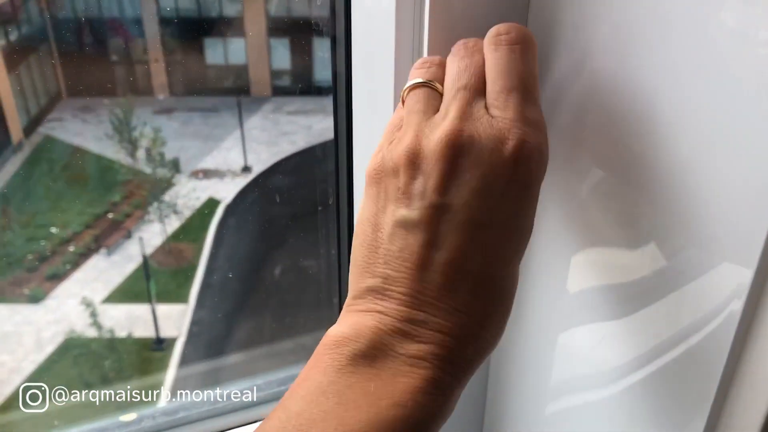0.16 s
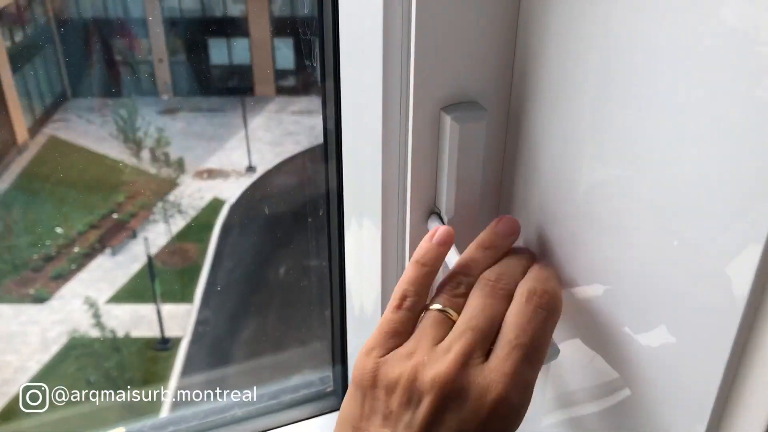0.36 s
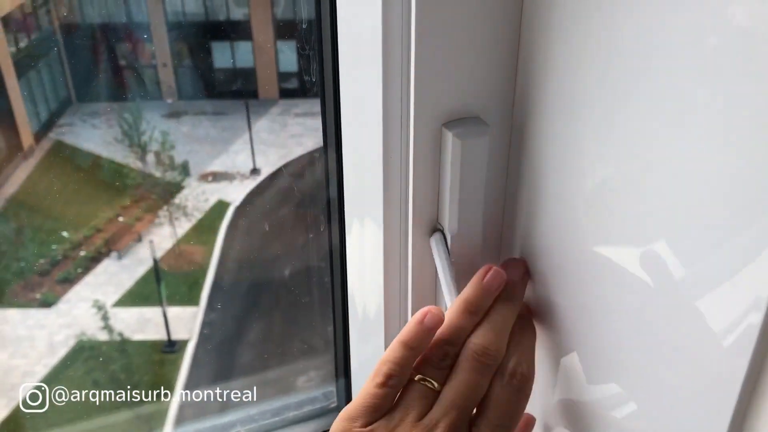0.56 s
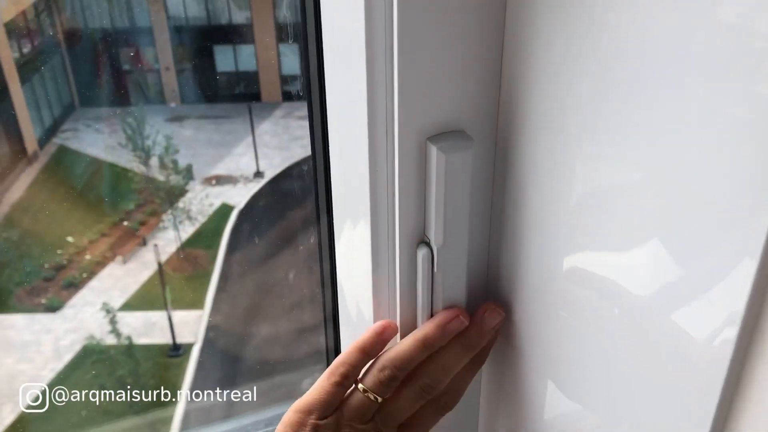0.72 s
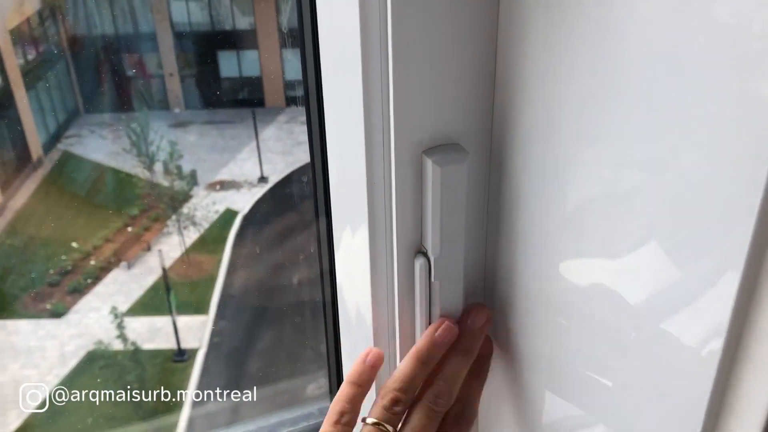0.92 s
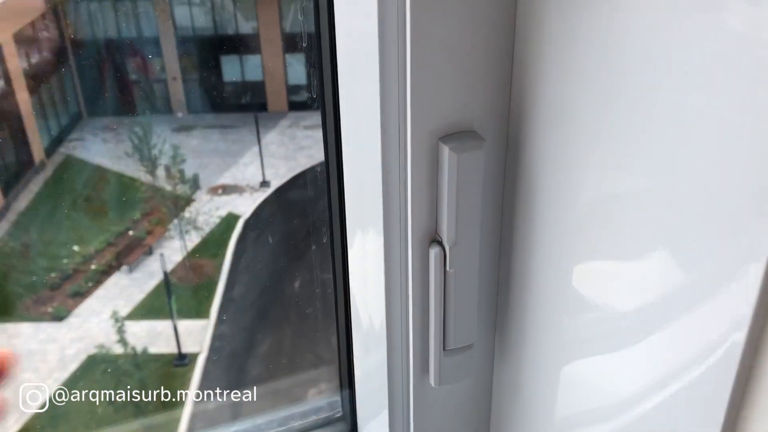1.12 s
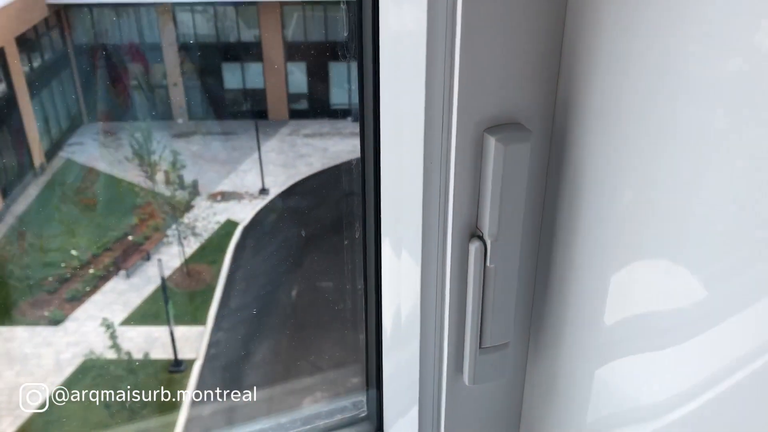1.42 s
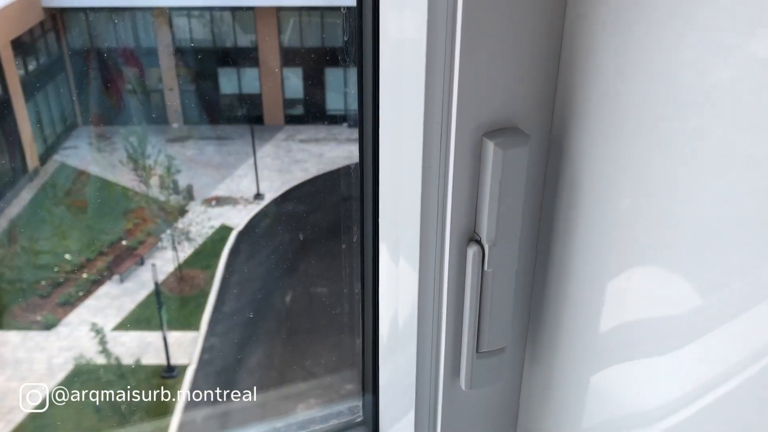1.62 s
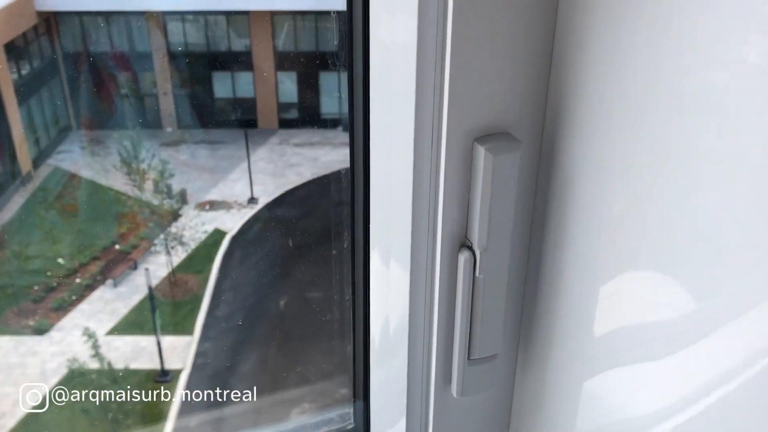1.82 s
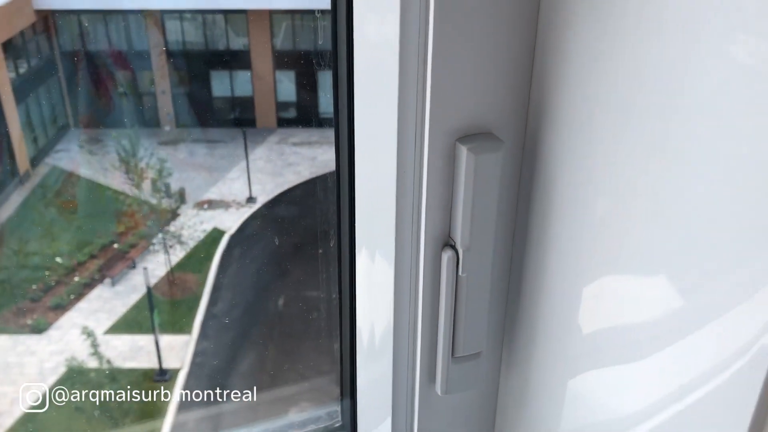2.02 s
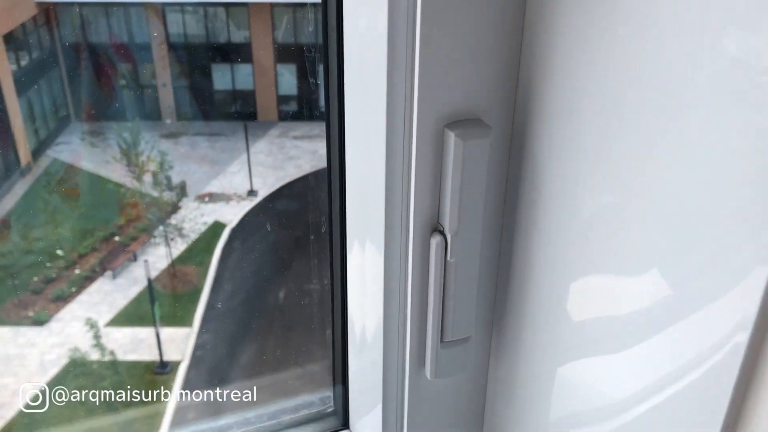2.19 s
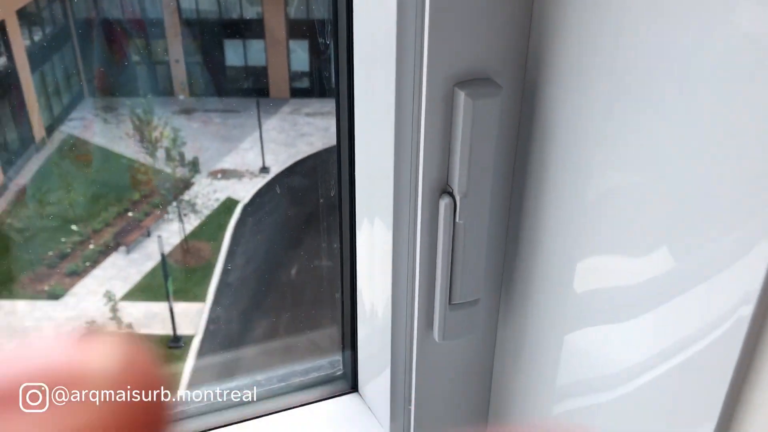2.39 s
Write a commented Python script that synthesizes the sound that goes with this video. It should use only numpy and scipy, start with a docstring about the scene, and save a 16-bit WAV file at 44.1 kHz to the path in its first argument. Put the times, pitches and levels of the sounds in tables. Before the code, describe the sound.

A window is closed and latched, close-miked in a bare, ringing room. Light knocks from 0.06 s build to a loud, slightly overloaded thunk with metal clatter at 0.3 s. Latch clacks follow at 0.46, 0.58, 0.65 and 0.72 s, with brief rubbing around 0.57-0.7 s. The ring fades into low, wavering room tone, faint ticks at 0.94, 1.23 and 1.78 s, soft bumps at 1.5 and 1.8 s; quiet hiss enters at 2.3 s.

```python
"""A window sash is pushed shut close to the microphone and its metal latch lever is folded down.
Coloured noise bursts and damped modes make the thunks, clacks and snaps; a bare room rings after the knocks.
Grainy noise makes the rubbing of fingers and lever, gliding sines make soft bumps in the frame.
Then a low, wavering room tone remains with thin air noise and a few faint ticks and bumps.
At the end a soft noise hiss with two faint whistles swells in."""
import sys
import numpy as np
from scipy import signal
from scipy.fft import rfft, irfft, next_fast_len
from scipy.io import wavfile
from scipy.ndimage import map_coordinates

SR = 44100
rng = np.random.default_rng(int(sys.argv[2]) if len(sys.argv) > 2 else 0)


def waveform_to_disk(signal):
    """Save audio, clipped to [-1, 1], as 16-bit WAV at the path in sys.argv[1]."""
    frames = np.transpose(np.atleast_2d(signal))
    scaled = np.clip(frames, -1, 1) * 32767
    samples = np.round(scaled).astype(np.int16)
    wavfile.write(sys.argv[1], SR, samples)


N = 112454
TIME = np.arange(N) / SR

# Contacts of sash and latch: t/s, frame body level/dB, clack level/dB, snap level/dB,
# top click level/dB, latch ring level/dB, frame t60/s, metal t60/s
KNOCKS = [(.0618, -22, -24, -37.5, -54, -50, 0.048, .02), (.0698, -22, -23.5, -34, -39, -50, 0.059, 0.028),
          (.105, -15, -57, -52, -59.5, -62, 0.03, 0.037), (.1938, -59, -33, -35.5, -34, -61, .03, 0.0062),
          (.2052, -21.5, -31, -35.5, -41, -58, 0.27, 0.038),
          (.2152, -20.5, -29, -50, -48, -35, 0.19, 0.054), (.2378, -14, -31, -37.5, -39.5, -24, 0.11, .022),
          (0.249, -5, -19.5, -32.5, -40, -23, 0.044, 0.012),
          (.2555, -19.5, -19.5, -35.5, -24, -42, .05, 0.069),
          (.2728, -9, -24.5, -29.5, -46, -52.5, 0.035, 0.03),
          (.2925, -5.5, -2.5, -12.5, -13.5, -10, 0.043, 0.016),
          (0.2968, 3.5, -9.5, -8.5, -21, -14.5, .07, 0.044), (.3025, 0, -9, -15, -20, -34, .08, 0.041),
          (.3135, -4, -48, -28, -48, -59, 0.087, 0.027), (.356, -12, -30.5, -47, -49.5, -53, 0.039, .03),
          (.4636, -11.5, -13.5, -22, -19.5, -10, 0.051, 0.017),
          (.5785, -13.5, -19.5, -21, -18.5, -24, 0.026, 0.022),
          (0.6532, -9, -16.5, -25, -31.5, -52, 0.047, 0.011),
          (0.6569, -7, -23.5, -48.5, -45, -52, 0.025, 0.053),
          (.7202, -10.5, -12, -10, -28.5, -53, 0.035, 0.0067)]
# Colour of the frame body: f/Hz, relative level/dB
BODY_COLOUR = [(40, -28), (110, -17), (180, -11.5), (270, -4), (380, -2.5), (460, -1), (570, -2.5),
               (680, -10.5), (800, -10.5), (1050, -18), (1600, -40), (4000, -71)]
# Colour of the metal clack: f/Hz, relative level/dB
CLACK_COLOUR = [(300, -37.5), (800, -6), (1250, 4.5), (1500, 0.5), (2000, 3), (2400, 2), (2830, -0.5),
                (3100, -0.5), (3800, -22.5), (6000, -38)]
# Colour of the brighter metal snap: f/Hz, relative level/dB
SNAP_COLOUR = [(1500, -39), (2800, -4.5), (3600, 3.5), (4300, -0.5), (5200, 0), (6300, -11), (10000, -31)]
# Colour of the metal's top click: f/Hz, relative level/dB
CLICK_COLOUR = [(3500, -46), (6200, 4), (9500, -2), (12500, -7.5), (15500, -8)]
# Ringing modes of the latch: f/Hz, relative level/dB, t60/s
LATCH_MODES = [(2620, -5, .018), (2830, 0, .026), (3200, -9, .016), (4600, -16, .015), (8450, -24, .015)]
# Modes of sash and pane, one list per column: f/Hz; relative level/dB; t60/s
SASH_HZ = [119, 172, 224, 268, 338, 435, 460, 553, 588, 712, 776, 1015]
SASH_MODE_DB = [-8, -15, -5.5, -7, -10, 1, -8.5, -13.5, -20, -13, -4.5, -13.5]
SASH_T60_S = [.8, 0.79, 0.19, 0.15, 0.87, 0.28, 0.32, 0.29, 0.28, 0.68, 0.15, 0.32]
# Modes of the clamped pane: f/Hz, relative level/dB, t60/s
LOCKED_MODES = [(138, 1, .6), (470, -4, .8), (481, -1, .95)]
BODY_ATTACK_S, METAL_ATTACK_S = 0.00054, 0.00017
EVENNESS = 0.71  # how flat a contact's spectrum is before the body colours it (0-1)
SASH_DB = -16  # sash modes, relative to the frame body
LOCKED_S, LOCKED_DB = .72, -31

# Strokes of fingers and lever: start t/s, length/s, level/dB
RUBS = [(0.057, 0.043, -44.5), (0.569, 0.033, -32.5), (0.6, 0.083, -40), (0.656, 0.053, -44.5)]
# Colour of the friction: f/Hz, relative level/dB
RUB_COLOUR = [(300, -43), (1000, -2), (2500, -0.5), (4500, -5), (7500, -8), (11000, -10.5), (15500, -15)]
RUB_ATTACK_S, RUB_RELEASE_S, RUB_GRAIN_DB = 0.0042, 0.0084, 3.5

# Dull pushes on the frame, gliding in pitch: t/s, level/dB, first f/Hz, last f/Hz, length/s
THUDS = [(.292, -23, 74, 30.7, 0.058), (.318, -29, 330, 150, 0.045), (.33, -24, 69, 57, .07),
         (0.469, -32, 68, 58, 0.076), (.68, -21, 86, 125, 0.035), (1.518, -36.5, 104, 45, .03),
         (1.782, -27, 174, 68, 0.022)]
# Small dry ticks in the frame: t/s, level/dB
TICKS = [(.943, -44), (1.229, -46), (1.779, -32.5)]
# Colour of a tick: f/Hz, relative level/dB
TICK_COLOUR = [(200, -22), (600, -10), (850, -14), (1100, -1), (1380, -9), (1650, -1), (2400, -6),
               (3000, -12), (3400, -6), (4000, -14), (5000, -20), (6100, -9), (9800, -12), (11000, -34),
               (15000, -45)]
TICK_T60_S = .017

# Colour of the hiss: f/Hz, relative level/dB
HISS_COLOUR = [(290, -40), (500, -22), (603, -1), (666, -7), (706, -2.5), (982, -3.5), (1170, -5.5),
               (2720, -7), (3060, -10), (3330, -1.5), (3790, -7), (6180, -11.5), (15500, -23.5)]
# Faint whistles in the hiss: f/Hz, level relative to the hiss/dB
HISS_WHISTLES = [(1003, -17), (3303, -17)]
HISS_START_S, HISS_RISE_S, HISS_DB, HISS_GROWS_DB_PER_S = 2.318, 0.035, -45.5, 6

# Decay time of the bare room: f/Hz, t60/s
ROOM_T60 = [(100, 0.58), (300, .8), (700, 0.84), (2000, 0.81), (5000, 0.73), (9000, 0.65), (15000, .3)]
# Strength of the room tail: f/Hz, level/dB
ROOM_GAIN = [(100, -5.5), (500, -3), (900, -0.5), (1400, -7), (2800, -8.5), (4000, -11.5), (5000, -10),
             (7000, -11.5), (8500, -7.5), (10000, -15), (14000, -9)]
ROOM_BUILD_S = 0.0027

# Course of the low room tone, before its waver: t/s, level/dB
TONE_LEVEL = [(0, -41), (.9, -42.5), (1.2, -42), (1.55, -44.5), (1.68, -41), (1.78, -49.5), (1.92, -49.5),
              (2.02, -45), (2.17, -43.5), (2.3, -42.5), (2.55, -41.5)]
# Colour of the room tone: f/Hz, relative level/dB
TONE_COLOUR = [(15, -58), (25, -22.5), (103, -8), (165, -8), (266, -5), (308, -9), (377, -9), (406, -17.5),
               (534, -15), (575, -24), (743, -21.5), (2000, -46.5), (2600, -64), (4400, -120)]
TONE_WAVER_DB = 1.1
# Colour of earlier handling, still dying away in the room: f/Hz, relative level/dB
HANDLING_COLOUR = [(60, -38.5), (95, -16), (150, 10), (300, -6), (500, -1), (900, -4.5), (1500, -24.5),
                   (3000, -25), (7000, -36), (15000, -42)]
HANDLING_DB, HANDLING_FADE_DB_PER_S = -30, 26
# Colour of the thin air noise: f/Hz, relative level/dB
AIR_COLOUR = [(100, 11.5), (1500, 1.5), (3000, -4.5), (6000, -5.5), (9300, -9), (10000, -5), (10700, -9.5),
              (15500, -8.5)]
AIR_DB = -55

CLIP_TOP, TOP_HZ = 1.02, 15850  # overload ceiling (1 = full scale), band limit


def amp(db):
    """Decibels to gain."""
    return 10 ** (np.asarray(db) / 20)


def unit(x):
    """Scale to rms 1."""
    return x / np.sqrt(np.mean(x ** 2) + 1e-20)


def along(points, hz):
    """Read (f/Hz, value) points along a log frequency axis."""
    f, value = np.transpose(points)
    return np.interp(np.log(hz + 1), np.log(f + 1), value)


def add(track, s, x):
    """Mix x into the track at time s."""
    i = round(s * SR)
    track[i:i + len(x)] += x[:N - i]


def noise(colour):
    """Steady noise of rms 1, filtered to a colour."""
    gain = amp(along(colour, np.fft.rfftfreq(N, 1 / SR)))
    return unit(irfft(rfft(rng.standard_normal(N)) * gain, N))


def wobble(rate):
    """A smooth random curve through `rate` knots a second."""
    knots = rng.standard_normal(int(N * rate / SR) + 4)
    return map_coordinates(knots, [TIME * rate])


def burst(colour, t60, attack):
    """A brief random contact force rung through a body of the given colour, one second long."""
    t = TIME[:SR]
    shape = amp(-60 * t / t60) * (1 - np.exp(-t / attack))
    force = rfft(rng.standard_normal(SR) * shape)
    flattened = irfft(force / np.abs(force) ** EVENNESS, SR)
    flattened = flattened * (t < 2 * t60)
    # a minimum-phase filter, so that the body never sounds before it is struck
    log_gain = np.log(amp(along(colour, np.fft.rfftfreq(SR, 1 / SR))))
    cepstrum = irfft(log_gain, SR)
    body = np.exp(rfft(2 * cepstrum * (t > 0) * (t < .5)))
    coloured = unit(irfft(rfft(flattened) * body, SR))
    return coloured * np.sqrt(np.mean(shape ** 2))


def ring(modes):
    """One second of damped modes, each with a random phase and about 2 dB of level scatter."""
    t = TIME[:SR]
    tones = np.zeros(SR)
    for hz, db, t60 in modes:
        decay = amp(db + 2 * rng.normal() - 60 * t / t60)
        tones += decay * np.sin(2 * np.pi * (hz * t + rng.random()))
    return tones * (1 - np.exp(-t / BODY_ATTACK_S))


def room(x):
    """The dry sound plus a fresh noise tail that dies at its own pace in each band of the bare room."""
    hz, t, grains = signal.stft(rng.standard_normal(SR), SR, nperseg=256)
    t60 = along(ROOM_T60, hz)[:, None]
    even_energy = np.sqrt(2 * np.log(1000) / (t60 * SR))  # long decays add no extra energy
    gain = amp(along(ROOM_GAIN, hz))[:, None] * even_energy
    tail = signal.istft(grains * gain * amp(-60 * t / t60), SR, nperseg=256)[1][:SR]
    tail = tail * (1 - np.exp(-TIME[:SR] / ROOM_BUILD_S))
    return np.pad(x, (0, SR - 1)) + signal.fftconvolve(x, tail)


def knocks():
    """Each contact shakes frame and pane and clacks the latch metal; the clamped pane sings on at the end."""
    out = np.zeros(N)
    for s, body_db, clack_db, snap_db, click_db, ring_db, frame_t60, metal_t60 in KNOCKS:
        frame = amp(body_db) * burst(BODY_COLOUR, frame_t60, BODY_ATTACK_S)
        metal = np.zeros(SR)
        for db, colour in [(clack_db, CLACK_COLOUR), (snap_db, SNAP_COLOUR), (click_db, CLICK_COLOUR)]:
            metal += amp(db) * burst(colour, metal_t60, METAL_ATTACK_S)
        latch = amp(ring_db) * ring(LATCH_MODES)
        add(out, s, room(frame + metal + latch))
        sash = ring(zip(SASH_HZ, SASH_MODE_DB, SASH_T60_S))
        add(out, s, amp(body_db + SASH_DB) * sash)
    add(out, LOCKED_S, amp(LOCKED_DB) * ring(LOCKED_MODES))
    return out


def rubs():
    """Fingers and lever slide with friction: noise strokes with a fast random grain, heard in the room."""
    strokes = np.zeros(N)
    for s, length, db in RUBS:
        fade_in = np.clip((TIME - s) / RUB_ATTACK_S, 0, 1)
        fade_out = np.clip((s + length - TIME) / RUB_RELEASE_S + .5, 0, 1)
        strokes += amp(db) * fade_in * fade_out
    friction = unit(noise(RUB_COLOUR) * amp(RUB_GRAIN_DB * wobble(330)))
    return room(strokes * friction)[:N]


def thuds():
    """The frame flexes for a few low cycles: short sine swells that glide in pitch."""
    out = np.zeros(N)
    for s, db, first_hz, last_hz, length in THUDS:
        u = np.linspace(0, 1, int(length * SR))
        phase = np.cumsum(first_hz * (last_hz / first_hz) ** u) / SR
        swell = np.sin(np.pi * u ** .75)  # peaks a little before the middle
        add(out, s, amp(db) * swell * np.sin(2 * np.pi * phase))
    return out


def ticks():
    """The closed frame settles with dry ticks: short bursts without room."""
    out = np.zeros(N)
    for s, db in TICKS:
        add(out, s, amp(db) * burst(TICK_COLOUR, TICK_T60_S, METAL_ATTACK_S))
    return out


def hiss():
    """Even coloured noise with two faint whistles of drifting phase swells in at the end."""
    t = TIME - HISS_START_S
    whistles = np.zeros(N)
    for hz, db in HISS_WHISTLES:
        whistles += amp(db) * np.sin(2 * np.pi * hz * TIME + 1.8 * wobble(70))
    level = np.clip(t / HISS_RISE_S, 0, 1) * amp(HISS_DB + HISS_GROWS_DB_PER_S * t)
    return level * (noise(HISS_COLOUR) + whistles)


def background():
    """Wavering low room tone, thin air noise and the fading ring of earlier handling, all coloured noise."""
    tone_db = np.interp(TIME, *np.transpose(TONE_LEVEL)) + TONE_WAVER_DB * wobble(25.35)
    tone = amp(tone_db) * noise(TONE_COLOUR)
    air = amp(AIR_DB) * noise(AIR_COLOUR)
    handling = amp(HANDLING_DB - HANDLING_FADE_DB_PER_S * TIME) * noise(HANDLING_COLOUR)
    return tone + air + handling


def scene():
    """All sources at one close microphone."""
    mix = knocks() + rubs() + thuds() + ticks() + hiss() + background()
    return mix[None]


def record(dry):
    """The loudest thunk overloads the recorder, which keeps nothing above its band limit."""
    clipped = dry / (1 + np.abs(dry / CLIP_TOP) ** 10) ** (1 / 10)
    size = next_fast_len(N + SR // 2)  # padded, so the filter does not wrap round
    in_band = np.fft.rfftfreq(size, 1 / SR) < TOP_HZ
    return irfft(rfft(clipped, size) * in_band, size)[..., :N]


dry = scene()
out = record(dry)
waveform_to_disk(out)
```